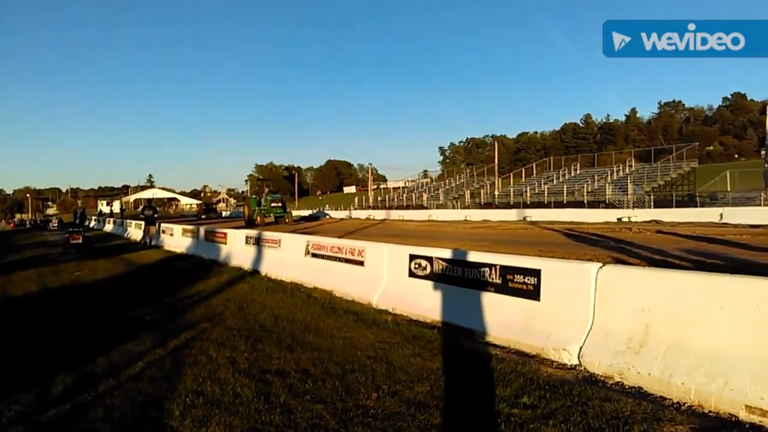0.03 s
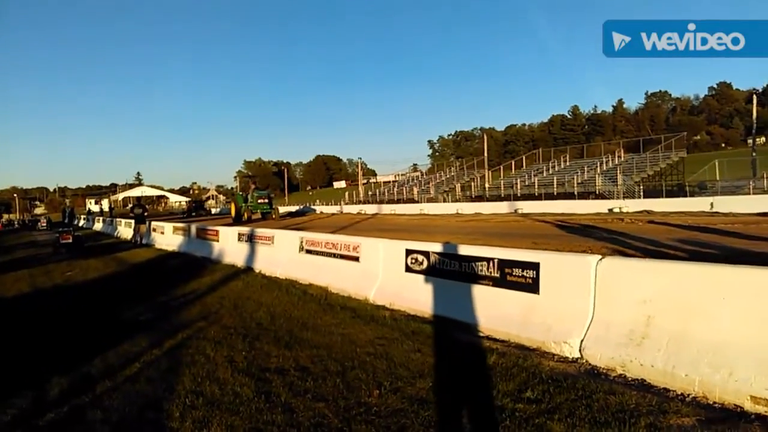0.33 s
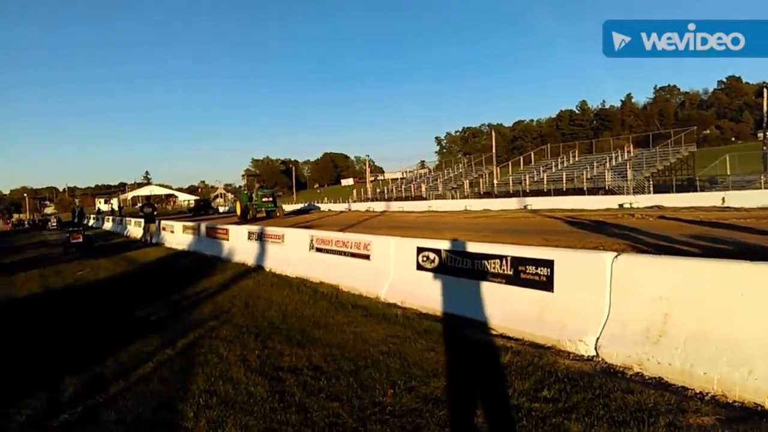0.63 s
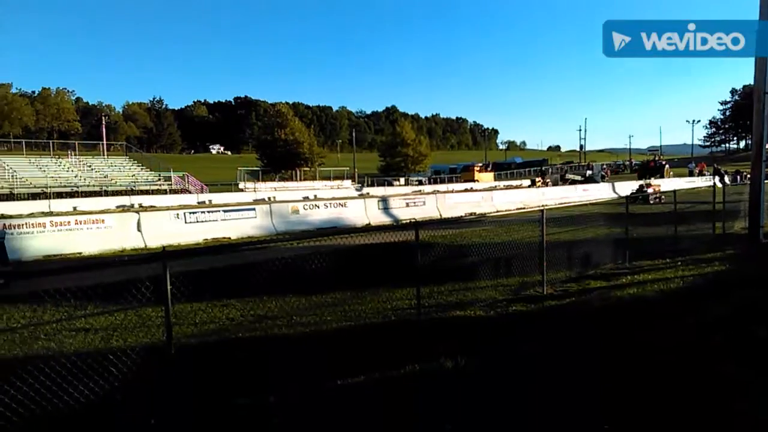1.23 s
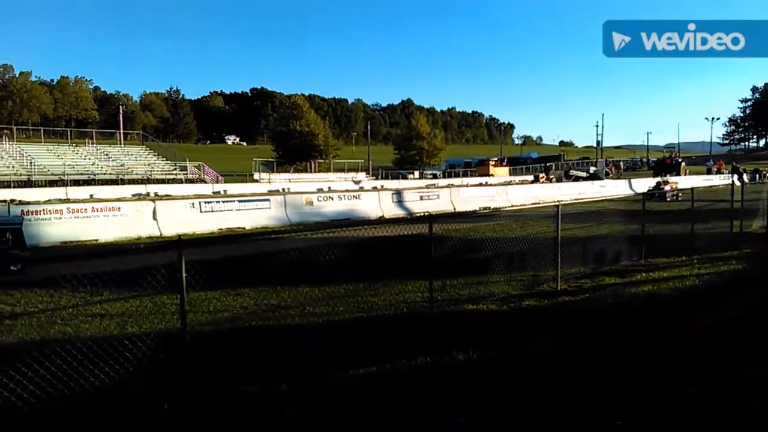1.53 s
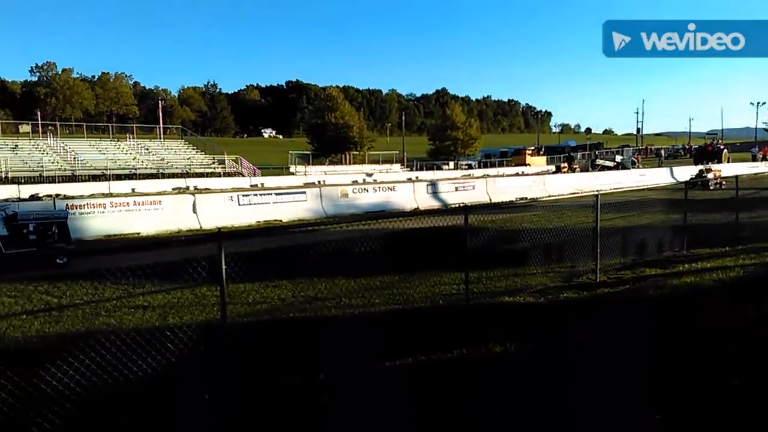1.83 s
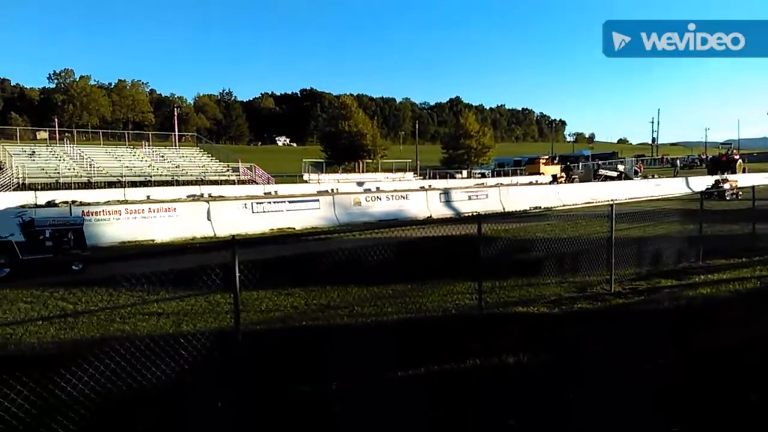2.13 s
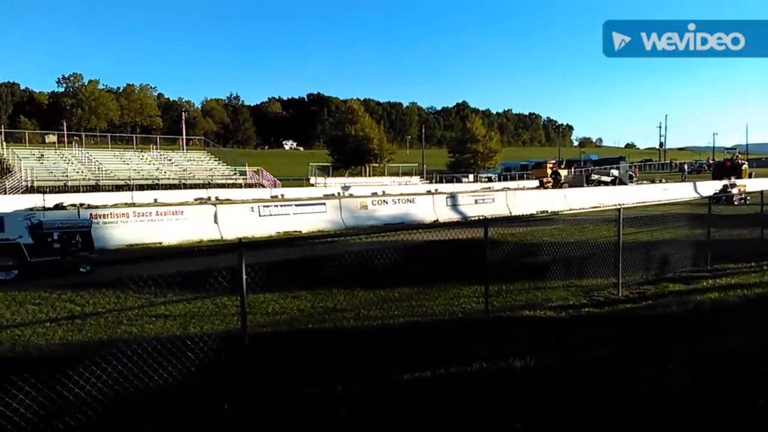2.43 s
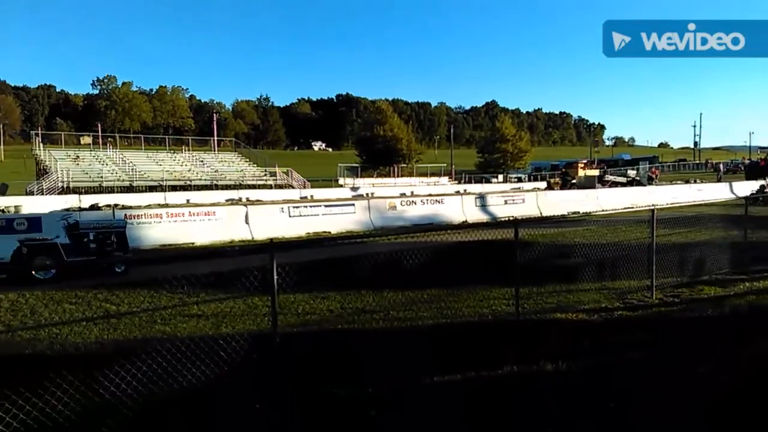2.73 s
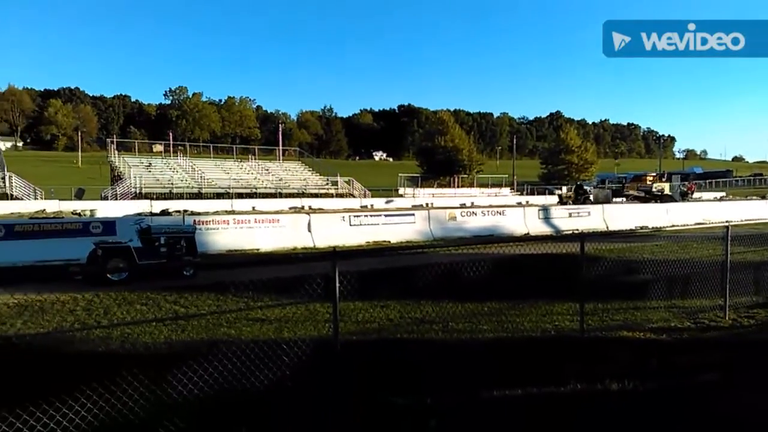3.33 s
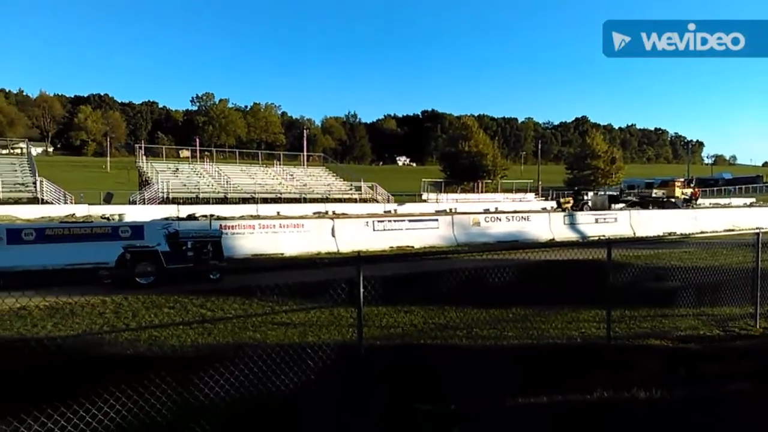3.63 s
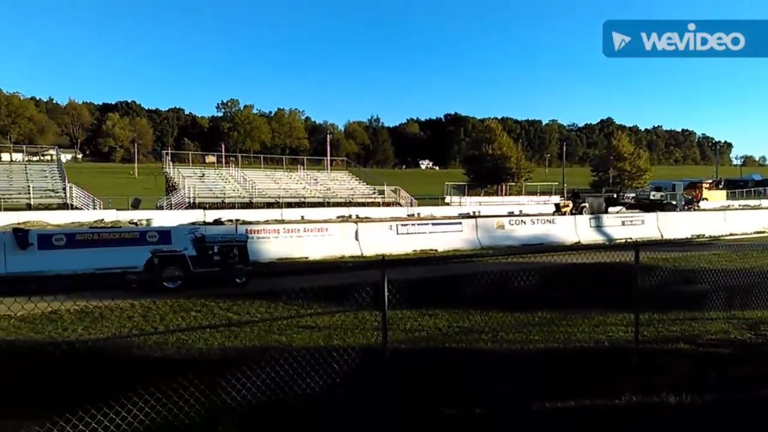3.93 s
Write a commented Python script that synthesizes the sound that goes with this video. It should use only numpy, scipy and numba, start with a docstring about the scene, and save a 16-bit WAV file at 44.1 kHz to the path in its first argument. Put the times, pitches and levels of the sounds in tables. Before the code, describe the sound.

A loud pulling tractor's raspy exhaust slows, cuts out briefly, then speeds up and drones.

```python
"""Hard, raspy exhaust beats slow down as a two-cylinder pulling tractor lugs under load outdoors. The sound
stops dead; after a blink of silence the scene changes, and the tractor in a long pull fades in, picks up speed
and holds it. Each beat is a pressure blast with a crack and a rasping puff of gas; in the long pull it also
rings the stack. Walls and stands scatter the beats, and a low rumble of air lies underneath."""
import sys
import numpy as np
from scipy import signal
from scipy.fft import rfft, irfft
from scipy.io import wavfile
from scipy.ndimage import uniform_filter1d
from numba import njit

SR = 44100
rng = np.random.default_rng(int(sys.argv[2]) if len(sys.argv) > 2 else 0)


def master_out(mix):
    """Clip the mix to full scale and print it as 16-bit PCM to the path in sys.argv[1]."""
    frames = np.transpose(np.atleast_2d(mix))
    ceiling = np.clip(frames, -1, 1)
    pcm = np.round(ceiling * 32767).astype(np.int16)
    wavfile.write(sys.argv[1], SR, pcm)


N = 176400
T = np.arange(N) / SR

# Engine speed, lugging and pulling: time_s, beat_rate_hz
LUG_SPEED = [(0, 39.37), (0.13, 39.94), (0.3, 36.91), (0.5, 36.17), (0.68, 33.53), (0.86, 30.43)]
PULL_SPEED = [(0.9, 44.67), (1.15, 45.1), (1.45, 46.45), (1.75, 48.42), (2.0, 50.68), (2.25, 51.44),
              (2.55, 52.0), (2.8, 51.95), (3.0, 52.39), (3.25, 52.07), (3.5, 52.04), (3.75, 51.5),
              (4.0, 52.1)]
# Exhaust faders, ahead of the trims: time_s, thump_db, bark_db, rasp_db, rip_db, sizzle_db
LUG_FADERS = [(0, -29, -35, -35.5, -42, -66), (0.22, -24, -33.5, -37, -40.5, -57.0),
              (0.34, -26.5, -38, -36.5, -38.5, -59), (0.44, -26, -41.5, -34, -39, -59),
              (0.52, -25.5, -40, -35, -38.5, -62), (0.58, -29.5, -41, -36.5, -39.5, -57),
              (0.66, -26, -37, -37, -35.5, -49), (0.76, -28, -41, -33, -39, -49),
              (0.85, -29, -40, -33, -38.5, -50)]
PULL_FADERS = [(1.3, -23, -32.5, -38.5, -44, -56), (1.65, -23, -33, -36, -41, -52.5),
               (1.78, -24, -32, -38, -35, -53.5), (1.9, -26, -34, -39, -33.5, -54.5),
               (2.03, -24, -34.5, -34, -38.5, -50), (2.3, -25.5, -34.5, -34, -38.5, -53),
               (2.55, -25.5, -34, -32.5, -42, -57), (2.72, -25.5, -35.5, -32, -41.5, -56.5),
               (2.95, -24.5, -31.5, -32.5, -41.5, -53.5), (3.22, -26, -34, -36.5, -43.0, -54.5),
               (3.45, -25, -35, -36, -38, -48), (3.62, -22.5, -33, -36.5, -38, -52.5),
               (3.76, -23.5, -32, -35.5, -39.5, -54), (4, -22.5, -31, -31.5, -39.5, -49)]
# Tone of each exhaust layer, from deep thump up to sizzle: frequency_hz, gain_db
LUG_THUMP_EQ = [(20, -59), (40, -20), (70, -6), (105, 5.5), (140, -7), (180, 2.5), (215, -15.5), (255, 2.5),
                (310, -9.5), (410, -10.5), (485, -24), (750, -21), (1500, -41), (14000, -100)]
PULL_THUMP_EQ = [(20, -77), (52, -13.5), (88, -5.5), (105, 2), (135, -8), (156, -2), (200, -1), (230, 7),
                 (265, -9), (315, -8), (365, -12.5), (450, -28.5), (750, -22.5), (1500, -37.5), (4500, -39),
                 (16000, -73)]
LUG_BARK_EQ = [(150, -44), (480, -27), (570, -5.5), (910, -6), (1080, -22.5), (2200, -23), (14000, -88)]
PULL_BARK_EQ = [(150, -86.5), (470, -15), (620, 3.5), (800, 2.5), (1050, -3.5), (1300, -5), (1550, -13.5),
                (14000, -76)]
LUG_RASP_EQ = [(600, -29), (1400, -16.5), (1750, -3.5), (2100, 1.5), (2450, 1), (2900, 1), (3300, -6.5),
               (4500, -17), (9000, -70)]
PULL_RASP_EQ = [(600, -45.5), (1550, -15), (1900, -3.5), (2100, -3), (2450, 2.5), (2800, -7), (3000, -3.5),
                (3400, -15), (4500, -13.5), (9000, -71.5)]
LUG_RIP_EQ = [(1200, -50), (2700, -8), (3400, 0.5), (4200, -4), (5200, -14.5), (6500, -19), (8000, -22.5),
              (14000, -42.5)]
PULL_RIP_EQ = [(1200, -21), (2700, -7), (3600, 1.5), (4400, -2), (4950, -4.5), (5300, -8.5), (6200, -11),
               (7500, -19.5), (14000, -52)]
LUG_SIZZLE_EQ = [(4000, -20), (7000, -4), (10500, 1), (16000, -31)]
PULL_SIZZLE_EQ = [(4000, -21), (7000, -4.5), (8500, -3), (10500, 1), (12500, -6.5), (14500, -15),
                  (17000, -55)]
# Moving booms in the thump and growl in the bark: time_s, centre_hz, gain_db
LUG_BOOM = [(0, 209, 17), (.18, 199, 8.5), (.3, 184, 8.5), (.5, 178, 6.5), (.7, 176, 7), (.85, 157, 2)]
PULL_BOOM = [(1.4, 193, -3.5), (1.8, 152, 9), (2.1, 210, 3.5), (3, 187, 1.5), (3.3, 190, 2.5),
             (3.6, 208, 12), (4, 230, 10)]
PULL_UPPER_BOOM = [(1.1, 365, 7.5), (1.5, 348, 2), (1.9, 270, 2.5), (2.2, 248, 10), (2.9, 270, 9),
                   (3.45, 276, -4)]
PULL_GROWL = [(1.6, 1003, 7), (2, 680, -2.5), (2.93, 675, 1.5), (3.3, 694, -1), (3.8, 812, 5.5)]
# Gas rushing on between beats, relative to a puff: time_s, level_db
LUG_RUSH = [(0, -8.5), (.3, -13.5), (.85, -20)]
PULL_RUSH = [(1, -6.5), (1.9, -14.5), (3.0, -11.5), (3.45, -18.5), (4, -9.5)]
# Metallic ring of the stack: time_s, high_pitch_hz, high_level_db, low_level_db
STACK_RING = [(1.2, 2500, -46, -43.5), (1.75, 2500, -34, -46), (1.95, 2540, -42.5, -41.5),
              (2.35, 2450, -42, -38.5), (2.95, 2540, -41, -43), (3.2, 2345, -36, -42),
              (3.8, 2300, -51, -45)]
# Hardest exhaust cracks while lugging: start_s, centre_hz, level_db
CRACKS = [(.3275, 3500, -24), (.5195, 3370, -14), (.754, 2840, -20), (.785, 2840, -24)]
# Tone of the rumbling air: frequency_hz, gain_db
AIR_EQ = [(15, -15), (45, -13), (130, -8.5), (400, -17.5), (1000, -16.5), (12000, -61)]
# Swell of that rumble: time_s, gain_db
AIR_SWELL = [(0, 1), (3.4, -4.5), (4, 7)]


def lugging():
    """The load drags the engine down; its beats grow separate and raspy."""
    times = beat_times(LUG_SPEED, first_s=0.0163)
    rush_db = curve(LUG_RUSH)
    thump = blast(times, LUG_THUMP_EQ, [LUG_BOOM], width_hz=18, spread_db=1)
    bark = blast_front(times, LUG_BARK_EQ, spread_db=1.5, gas_db=-15, rush_db=-16, wet_db=-9.5)
    rasp = gas_jet(times, LUG_RASP_EQ, rush_db, attack_s=0.00091, hold_s=0.00088, decay_s=0.0018,
                   crack_db=-12.5, spread_db=0.5, wet_db=-5)
    rip = gas_jet(times, LUG_RIP_EQ, rush_db, attack_s=0.0007, hold_s=0.0028, decay_s=0.0015,
                  crack_db=-23, spread_db=4, wet_db=-5.5)
    sizzle = gas_jet(times, LUG_SIZZLE_EQ, rush_db=-37, attack_s=0.0011, hold_s=0.00036, decay_s=0.0012,
                     crack_db=-24, spread_db=-2, wet_db=-11)
    return mix([thump, bark, rasp, rip, sizzle], LUG_FADERS, trims_db=(-0.5, -0.5, -2, -0.36, -8))


def pulling():
    """The engine gathers speed and drones on at full load, its stack ringing."""
    times = beat_times(PULL_SPEED, first_s=0.9099)
    rush_db = curve(PULL_RUSH)
    bark = blast_front(times, PULL_BARK_EQ, spread_db=1.86, gas_db=-16, rush_db=-28, wet_db=-5.5)
    bark = steady(sweep_eq(bark, PULL_GROWL, width_hz=52))
    thump = blast(times, PULL_THUMP_EQ, [PULL_BOOM, PULL_UPPER_BOOM], width_hz=51, spread_db=0.85)
    rasp = gas_jet(times, PULL_RASP_EQ, rush_db + 1.2, attack_s=0.0013, hold_s=0.002, decay_s=0.0014,
                   crack_db=-5.5, spread_db=0, wet_db=-4.5)
    rip = gas_jet(times, PULL_RIP_EQ, rush_db, attack_s=0.00043, hold_s=0.00089, decay_s=0.002,
                  crack_db=-17, spread_db=8.5, wet_db=-9.5)
    sizzle = gas_jet(times, PULL_SIZZLE_EQ, rush_db - 3, attack_s=0.00073, hold_s=0.00048,
                     decay_s=0.0022, crack_db=-10, spread_db=4.5, wet_db=-5)
    layers = [thump, bark, rasp, stack_echo(rip), sizzle]
    return mix(layers, PULL_FADERS, trims_db=(-1, -0.5, -2.5, -1.08, -0.06)) + stack_ring(times)


def beat_times(speed, first_s, hunt_s=0.00021, hunt_hz=9, jitter_s=0.00007):
    """When the exhaust fires: the engine hunts slightly and each beat lands a hair off time."""
    beats = np.cumsum(curve(speed)) / SR
    beats -= np.interp(first_s, T, beats)
    times = np.interp(np.arange(int(beats[-1]) + 1), beats, T + hunt_s * drift(hunt_hz))
    return times + jitter_s * rng.standard_normal(N)[:len(times)]


def pulses(times, spread_db):
    """One click per beat, each up to spread_db stronger or weaker."""
    position = np.clip(times * SR, 0, N - 2)
    sample = position.astype(int)
    fraction = position - sample
    strength = undb(spread_db * rng.uniform(-0.92, 1, N)[:len(times)])
    return (np.bincount(sample, strength * (1 - fraction), N)
            + np.bincount(sample + 1, strength * fraction, N))


def blast(times, eq, booms, width_hz, spread_db):
    """The deep pressure thump of each beat, with booms that shift as the tractor moves."""
    thump = colour(-pulses(times, spread_db), eq)
    for boom in booms:
        thump = sweep_eq(thump, boom, width_hz)
    return scatter(steady(thump), wet_db=-16)


def blast_front(times, eq, spread_db, gas_db, rush_db, wet_db):
    """The hard front of each blast barks, with a little turbulence behind it."""
    clicks = pulses(times, spread_db)
    gas = puff(clicks, attack_s=0.00047, hold_s=0.0027, decay_s=0.001, rush_db=rush_db)
    return scatter(colour(undb(gas_db) * gas - unit(clicks), eq), wet_db)


def gas_jet(times, eq, rush_db, attack_s, hold_s, decay_s, crack_db, spread_db, wet_db):
    """A sharp crack and the jet of gas that tears out after it."""
    clicks = pulses(times, spread_db)
    gas = puff(clicks, attack_s, hold_s, decay_s, rush_db)
    return scatter(colour(gas - undb(crack_db) * unit(clicks), eq), wet_db)


def puff(clicks, attack_s, hold_s, decay_s, rush_db):
    """Turbulent gas let out at every beat, over an unbroken rush."""
    age = T[:SR // 20]
    shape = np.minimum(age / attack_s, 1) * np.exp(-np.maximum(age - attack_s - hold_s, 0) / decay_s)
    envelope = np.hypot(convolve(clicks, shape), undb(rush_db))
    return unit(envelope * rng.standard_normal(N))


def stack_ring(times, low_hz=1870, width_hz=312, lag_s=0.001095, jitter_s=0.00011):
    """Just after each blast the stack rings in two metallic modes; the high one wanders."""
    blows = pulses(times + lag_s + jitter_s * rng.standard_normal(N)[:len(times)], spread_db=2.5)
    high = scatter(mode(blows, curve(STACK_RING), width_hz), wet_db=-6.5)
    low = scatter(mode(blows, low_hz, width_hz), wet_db=-6.5)
    return high * undb(curve(STACK_RING, column=2)) + low * undb(curve(STACK_RING, column=3))


def stack_echo(jet, delay_s=0.001616, echo_db=-16):
    """One short echo makes the jet sound hollow."""
    return unit(jet + undb(echo_db) * np.interp(T - delay_s, T, jet))


def burst(start_s, centre_hz, level_db, width_hz, decay_s):
    """A crack or knock: a snap of noise in one resonance."""
    body = mode(rng.standard_normal(N), centre_hz, width_hz)
    age = (T - start_s) / decay_s
    envelope = np.exp(-np.abs(age)) * np.clip(1 + 2 * age, 0, 1)
    return undb(level_db) * body * envelope


def scatter(x, wet_db, t60_s=0.12, predelay_s=0.0023, renew_s=0.358, patterns=15):
    """Short reflections off walls and stands; their pattern changes as the tractor moves."""
    age = T[:SR // 5]
    tail = undb(-60 * age / t60_s) * np.clip(age / predelay_s - 1, 0, 1)
    wet = np.zeros(N)
    for k in range(patterns):
        crossfade = np.cos(np.pi / 2 * np.clip(T / renew_s - k, -1, 1))
        wet += crossfade * convolve(x, tail * rng.standard_normal(len(age)))
    return unit(unit(x) + undb(wet_db) * unit(wet))


def air_rumble(base_db=-41):
    """A low, wavering bed of open air that sinks slowly and swells at the end."""
    level_db = base_db + curve(AIR_SWELL) + drift(rate_hz=3.31)
    return undb(level_db) * unit(colour(rng.standard_normal(N), AIR_EQ))


def mix(layers, faders, trims_db):
    """Ride each exhaust layer on its own fader, plus a constant trim."""
    return sum(layer * undb(curve(faders, column=k + 1) + trims_db[k]) for k, layer in enumerate(layers))


def colour(x, eq, size=8192):
    """Minimum-phase EQ: nothing rings ahead of an attack."""
    hz, db = np.array(eq, float).T
    bin_hz = np.arange(size // 2 + 1) * SR / size
    gain = undb(np.interp(np.log(bin_hz + 1), np.log(hz), db))
    cepstrum = irfft(np.log(gain))
    cepstrum[1:size // 2] *= 2
    cepstrum[size // 2 + 1:] = 0
    return convolve(x, irfft(np.exp(rfft(cepstrum))))


def sweep_eq(x, rows, width_hz):
    """Boost or dip one moving band."""
    return x + (undb(curve(rows, column=2)) - 1) * resonate(x, curve(rows), float(width_hz))


def mode(x, centre_hz, width_hz):
    """One ringing band: two band-passes in series, brought to an rms of 1."""
    for _ in range(2):
        x = resonate(x, centre_hz * np.ones(N), float(width_hz))
    return unit(x)


@njit
def resonate(x, centre_hz, width_hz):
    """Band-pass with a moving centre, gain 1 at the centre."""
    out = np.empty(len(x))
    band_state, low_state = 0., 0.
    for i in range(len(x)):
        tuning = np.tan(np.pi * centre_hz[i] / SR)
        damping = width_hz / centre_hz[i]
        band = (band_state + tuning * (x[i] - low_state)) / (1 + tuning * (tuning + damping))
        band_state = 2 * band - band_state
        low_state += 2 * tuning * band
        out[i] = damping * band
    return out


def steady(x):
    """Hold the slow level near 1, so that a resonance changes only the colour."""
    return x / np.sqrt(uniform_filter1d(x ** 2, SR // 4) + np.var(x) / 100)


def drift(rate_hz):
    """Smooth random wander with an rms of 1."""
    span = int(SR / rate_hz)
    steps = np.repeat(rng.standard_normal(N // span + 1), span)
    return unit(uniform_filter1d(uniform_filter1d(steps, span), span)[:N])


def convolve(x, response):
    """Pass a sound through an impulse response."""
    return signal.fftconvolve(x, response)[:N]


def curve(rows, column=1):
    """One column of a table, joined by straight lines in time."""
    rows = np.array(rows, float)
    return np.interp(T, rows[:, 0], rows[:, column])


def unit(x):
    """Scale to an rms of 1."""
    return x / np.sqrt(np.mean(x ** 2) + 1e-18)


def undb(db):
    """Decibels to gain."""
    return 10 ** (np.asarray(db) / 20)


def scene(stop_s=0.857, resume_s=0.899, fade_from_s=0.88, fade_s=0.3):
    """The lugging, with hard cracks and a light knock, stops dead; after a brief silence the scene changes and
    the long pull fades in."""
    air = air_rumble()
    cracks = sum(burst(*crack, width_hz=830, decay_s=0.002) for crack in CRACKS)
    knock = burst(start_s=0.7395, centre_hz=1190, level_db=-27, width_hz=160, decay_s=0.0037)
    lug = (lugging() + cracks + knock + air) * (T < stop_s)
    fade_in = np.clip((T - fade_from_s) / fade_s, 0, 1) ** 1.06 * (T > resume_s)
    pull = (pulling() + air) * fade_in
    return (lug + pull)[None]


def record(dry):
    """A steep low-pass shaves off the very top."""
    top_hz = 15200
    return signal.sosfilt(signal.ellip(8, 0.2, 70, top_hz, fs=SR, output="sos"), dry)


dry = scene()
out = record(dry)
master_out(out)
```